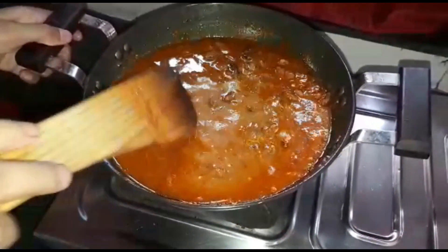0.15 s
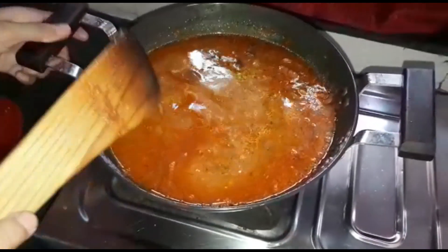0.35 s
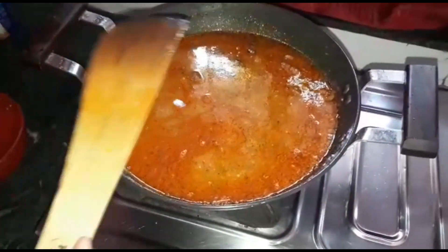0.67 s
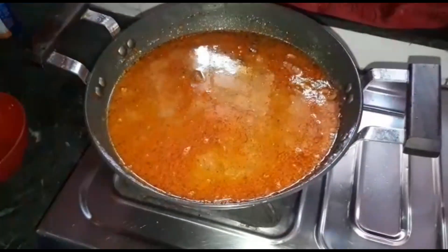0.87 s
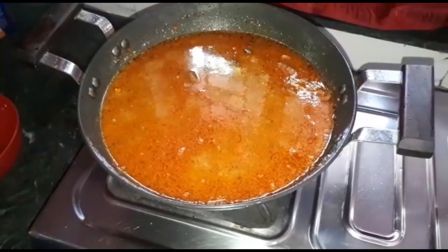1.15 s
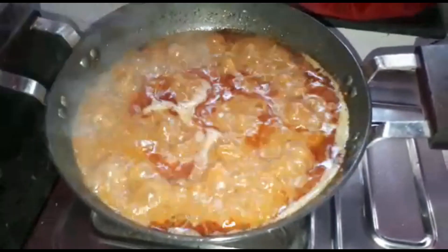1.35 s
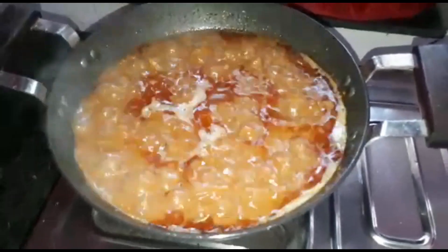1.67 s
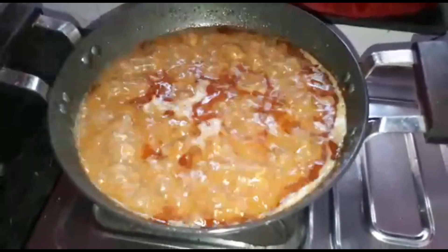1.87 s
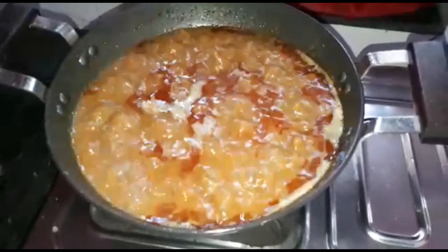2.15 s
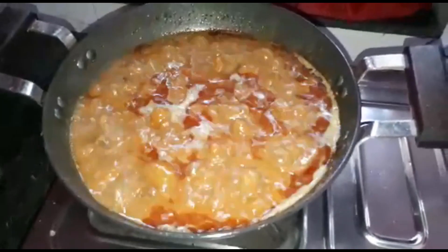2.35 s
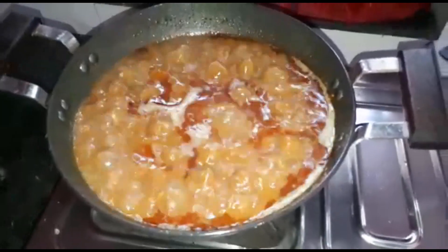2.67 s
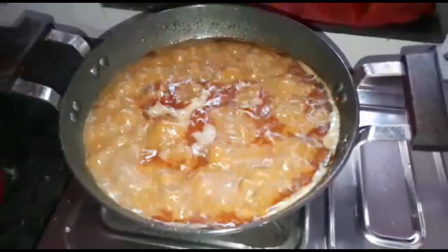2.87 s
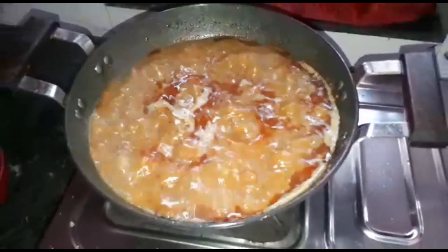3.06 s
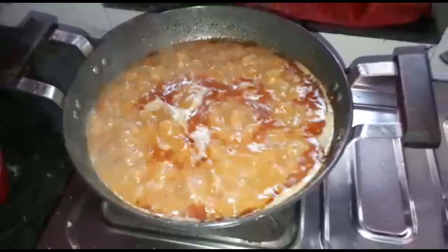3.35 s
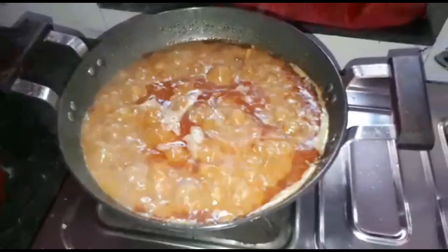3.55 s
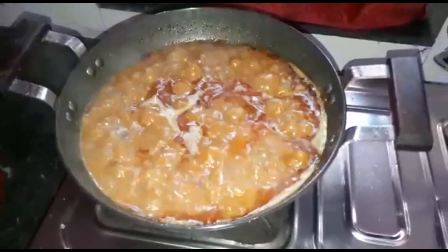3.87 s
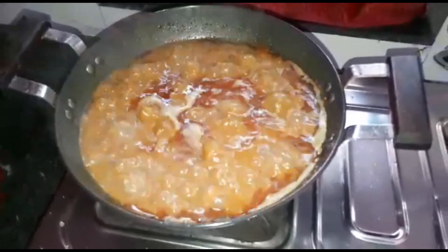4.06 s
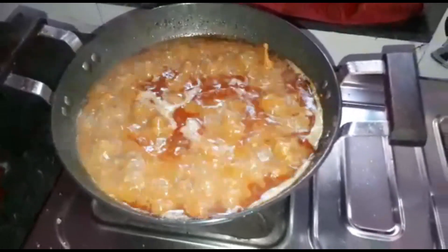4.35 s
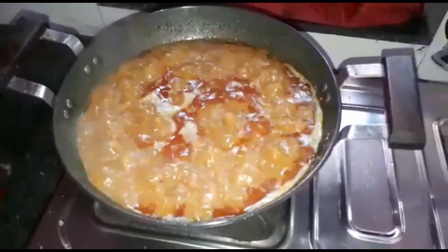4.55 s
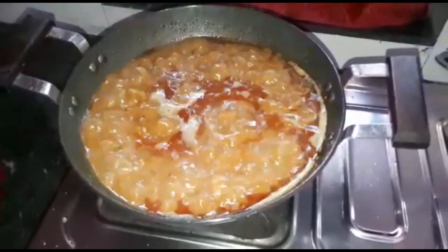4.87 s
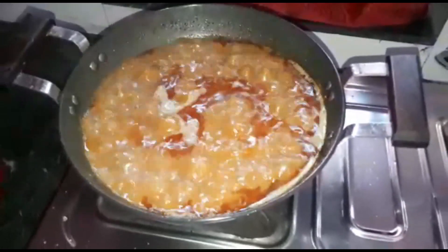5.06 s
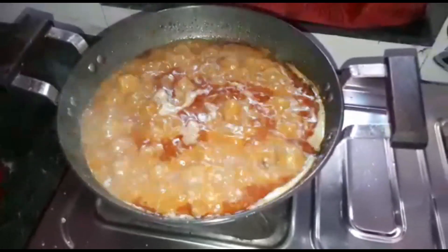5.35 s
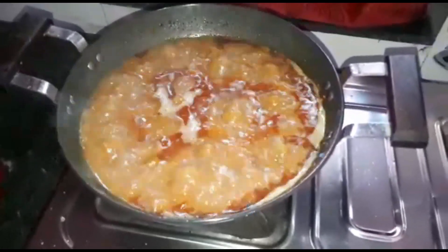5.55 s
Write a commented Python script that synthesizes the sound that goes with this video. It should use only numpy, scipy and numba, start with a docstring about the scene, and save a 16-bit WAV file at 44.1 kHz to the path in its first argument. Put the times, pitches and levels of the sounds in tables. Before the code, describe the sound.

For the first 1.2 seconds a small kitchen is very quiet: soft room tone, a slightly wavering low hum, a barely audible slosh at the start and a thin high squeak near 0.1 s. From about 0.43 to 0.6 s a spatula rattles on the pan, a short woody-metallic scrape with some five quick weakening bounces, followed by a faint rustle. At 1.24 s the sound jumps abruptly to a pan of thick curry at full boil, far louder. Short, round, wet bubble pops, mostly mid-pitched, come in irregular clusters over a dense simmer of smaller blips. Bright droplet spits tick on top, with steam hiss surging around the bigger bursts and a steady low gas-flame roar beneath. The boil repeats a 1.56-second pattern nearly three times, without fading, until about 5.7 s. Close phone pickup, stereo, with brief pan reflections and softened extreme top.

```python
"""A quiet kitchen: a wavering hum, a faint squeak (narrow noise), a spatula rattling on a pan (noise through
ringing modes). At 1.24 s thick curry on gas boils hard at once: steam bubbles burst as short rounded blips,
droplets spit as noise ticks over a dense simmer of small blips, coloured-noise steam and the roar of the flame.
The boiling is one round of 1.56 s, played nearly three times."""
import sys
import numpy as np
from scipy import signal
from scipy.fft import rfft, irfft
from scipy.io import wavfile
from numba import njit

SR = 44100
rng = np.random.default_rng(int(sys.argv[2]) if len(sys.argv) > 2 else 0)


def pcm_store(signal):
    """Save signal as 16-bit PCM."""
    levels = np.round(np.clip(np.atleast_2d(signal), -1, 1) * 32767)
    wavfile.write(sys.argv[1], SR, levels.astype(np.int16).T)


N = 251370

# Loudest bubbles of one round. Each row: time in s, pitch in Hz, peak in dB, length in cycles (1.1 at least).
BUBBLES = [(1.2439, 1760, -19.5, 1.8), (1.273, 1600, -17, 1.9), (1.2756, 11300, -34, 2.8),
           (1.2775, 1420, -22.0, 1.5), (1.2862, 1750, -17, 1.5), (1.3039, 7990, -41, 1.2),
           (1.3693, 590, -26.5, 1.6), (1.3702, 1440, -20.5, 0.89), (1.3785, 544, -35, 1.7),
           (1.3838, 930, -23, 1.2), (1.3916, 1430, -32, 4.9), (1.399, 1300, -25, 2.1),
           (1.425, 486, -31.5, 1.1), (1.4323, 900, -23, 0.88), (1.4705, 3540, -27.5, 1.7),
           (1.4736, 3940, -35.5, 1.7), (1.4916, 1190, -27, 2.4), (1.542, 1520, -23, 0.96),
           (1.5487, 1680, -20.5, 1), (1.5794, 1020, -22, 0.98), (1.5923, 1400, -24, 1.6),
           (1.609, 940, -28, 1.4), (1.6223, 7940, -37.5, 1.6), (1.6984, 1370, -22, 3),
           (1.7049, 716, -32, 2.4), (1.707, 1380, -26, 2.2), (1.7442, 430, -40, 3),
           (1.7851, 1190, -24, 2.1), (1.861, 12200, -45, 1.3), (1.8827, 1410, -22.5, 1.2),
           (1.8904, 2400, -30, 1.5), (1.8971, 1780, -14, 1), (1.9179, 2320, -25.5, 1.8),
           (1.9355, 546, -36, 2.2), (1.9567, 1560, -19, 1.4), (1.9692, 1730, -15.5, 1.2),
           (1.9732, 1420, -24, 2.3), (1.9947, 580, -31, 1.7), (2.0428, 1610, -26, 2.4),
           (2.0489, 6630, -30, 1.6), (2.049, 2830, -27.5, 1.2), (2.0526, 3400, -22.5, 1.6),
           (2.0528, 8150, -48.5, 3.3), (2.065, 2730, -24.5, 0.49), (2.0717, 2400, -22.5, 1),
           (2.0985, 920, -24, 1.6), (2.1263, 1230, -22, 1.2), (2.1648, 1860, -15, 1.6),
           (2.167, 1460, -19.5, 1.4), (2.1698, 1430, -34, 1.9), (2.1789, 7330, -49, 2.1),
           (2.1823, 2150, -22, 1.7), (2.185, 1520, -23.0, 2.2), (2.25, 7040, -30, 2.3),
           (2.2564, 650, -38.5, 1.8), (2.2688, 1080, -32.0, 5.7), (2.286, 830, -34.5, 2.5),
           (2.3037, 3900, -36.5, 3.7), (2.3089, 1180, -31.5, 2), (2.33, 1020, -28.5, 2.4),
           (2.3417, 2330, -23.5, 1.8), (2.3587, 1830, -24, 1.3), (2.3615, 1650, -20, 0.65),
           (2.394, 1010, -27, 1.5), (2.414, 1110, -26.5, 1.2), (2.4326, 1450, -26, 1.1),
           (2.449, 1320, -32.5, 2.8), (2.4525, 1390, -27, 2.1), (2.4629, 1540, -28, 1.6),
           (2.4752, 2150, -21.5, 1.6), (2.5005, 1680, -22, 1.8), (2.5281, 1860, -18.5, 1.2),
           (2.5354, 1880, -20, 2.8), (2.557, 1270, -26.5, 1.9), (2.5668, 1520, -18, 2.1),
           (2.6233, 450, -34.5, 2.8), (2.675, 1720, -24.5, 1.6), (2.7176, 1590, -23, 1),
           (2.7291, 453, -37, 2.8), (2.7535, 1420, -29, 3)]
# Small-bubble strength by pitch. Each row: pitch in Hz, added level in dB.
SIMMER_SIZE = [(300, -23.5), (480, -6.5), (1300, -2), (2400, -6), (3800, 1.5), (5500, -11.5), (7600, 0.5),
               (9300, -20), (12000, -6.5), (15800, 2.5)]
# Lulls of the coarse simmer. Each row: centre in s, half length in s, change in dB.
LULLS = [(1.318, 0.042, -5), (1.516, 0.0061, -15), (1.656, 0.039, -1.5), (1.998, .008, -10),
         (2.511, 0.017, -4.5), (2.591, 0.0078, -12), (2.774, 0.0081, -3.5)]
# Fine spray through one round. Each row: time in s, level in dB.
SPRAY_LEVEL = [(1.24, -55.5), (1.33, -56.5), (1.47, -50), (1.65, -55.5), (1.93, -52.5), (2.25, -53),
               (2.5, -52.5), (2.64, -59), (2.72, -51), (2.8, -52)]
# Arrival lag, left port first. Each row: pitch in Hz, lag in s.
PORT_LAG = [(500, 0.000059), (1100, 0.000048), (1750, 0.00017), (2800, 0.000242)]
# Port balance. Each row: pitch in Hz, left minus right in dB.
PORT_BALANCE = [(200, -12), (700, 0.5), (1300, -5), (2400, -8), (4400, 5), (8000, -1)]
# Droplets spitting on the hot wall. Each row: time in s, gate level in dB.
SPITS = [(1.2753, -43.5), (1.3033, -30.5), (1.4314, -37), (1.4663, -50), (1.5332, -44.5), (1.678, -40.5),
         (1.859, -35.5), (1.9637, -39), (2.048, -40), (2.1338, -46), (2.4397, -33.5), (2.563, -37.5),
         (2.6939, -38.5), (2.781, -40)]
# Noise colours, before levelling. Each row: frequency in Hz, relative density in dB per Hz.
SPIT_COLOUR = [(2500, 3), (5000, -0.5), (7600, 0.5), (9300, -8.5), (12000, -0.5), (15800, -10.5)]
STEAM_COLOUR = [(100, -4), (2000, 10.5), (3700, -0.5), (5500, -9.5), (7600, -9.5), (9300, -22),
                (12000, -12.5), (15800, -40)]
FLAME_COLOUR = [(25, -49), (52, -45), (68, 0.5), (85, -13.5), (125, -7), (165, 1.5), (290, -1), (420, -2.5),
                (1500, -36.5)]
KITCHEN_COLOUR = [(25, -39), (80, -25), (130, -10.5), (300, -14.5), (486, -22), (1000, -28.5),
                  (8300, -39.5), (15800, -40)]
# Pan modes. Each row: frequency in Hz, relative gain in dB, T60 in s.
PAN_MODES = [(720, 3, 0.13), (863, 7, 0.091), (933, 7.5, 0.08), (1065, 0, 0.097), (1230, -4, 0.078),
             (1410, 1.5, 0.14), (1510, 10, 0.04), (1644, 12.5, 0.039), (1860, 6, 0.045), (2070, 2, 0.052),
             (2460, 3, 0.045)]
# Faint wavering bands. Each row: centre in Hz, width in Hz, level in dB.
HUM_BANDS = [(239, 6.7, -86.5), (263, 11, -80.5), (362, 45, -81), (11900, 500, -90.5)]
# Squeak bands. Each row: start in s, length in s (decays by e^2.4), centre in Hz, level before fading in dB.
SQUEAK = [(0.108, 0.11, 5890, -61.5), (.11, 0.11, 11800, -73), (0.127, 0.17, 14700, -70)]

BOIL_START_S, ROUND_SAMPLES = 1.2415, 68796
SIMMER_PER_S, SIMMER_DB, SIMMER_SCATTER_DB, SPRAY_SCATTER_DB = 2000, -39.5, 3, 2.0
# A loud burst stirs up small bubbles, spray and steam; a share scales the stir in dB.
SWARM_DB, SWARM_LEAD_S, SWARM_DECAY_S = -23.5, 0.0066, 0.01
SWARM_SHARE, SPRAY_SHARE, STEAM_SHARE, SPIT_TILT_DB_PER_OCTAVE = .3, 0.34, 0.49, 9.5
PORT_LAG_SPREAD, PORT_PLACE_DB = 0.49, 12
SPIT_RISE_S, SPIT_DECAY_S, SPIT_HISS_DB = 0.00051, 0.0019, -5.0
SMALL_SPITS_PER_S, SMALL_SPIT_DB, SMALL_SPIT_SCATTER_DB = 89, -59, 6
PAN_ECHO_DB, PAN_ECHO_T60_S = -12, .04
FULL_PAN_HZ, FULL_PAN_T60_S, FULL_PAN_DB = 447, 0.064, -58.5
STEAM_RE_SPRAY_DB, FLAME_DB = 0.5, -48
RATTLE_START_S, BOUNCES, BOUNCE_GAP_S, BOUNCE_S = .435, 5, .026, 0.008
BOUNCE_DB, BOUNCE_STEP_DB, RIM_HZ, RIM_WIDTH_HZ = -46.5, -1, 4700, 700
SCRAPE_DB, SCRAPE_HOLD_S, SCRAPE_FADE_S, SCRAPE_BOUNCE_SHARE = -51, 0.014, 0.079, 0.22
KITCHEN_DB, HUM_HZ, HUM_DB, HUM_WOBBLE_RE_HUM_DB = -69, 157.5, -70, -21
SLOSH_S, SLOSH_DB, SLOSH_SWELL_S, SLOSH_FADE_S = 0.043, -65, 0.032, 0.042
RUSTLE_S, RUSTLE_HALF_S, RUSTLE_HZ, RUSTLE_DB = 0.63, .04, 10500, -82
TOP_HZ = 15950


def boiling():
    """One round: bubbles echoed by pan wall and stove, a full-pan boom, steam and flame; then repeated."""
    loud = burst(*np.array(BUBBLES, float).T, .12)
    # bubbles carry nothing below about 150 Hz
    highpass = signal.butter(2, 150, "high", fs=SR, output="sos")
    bubbles = signal.sosfilt(highpass, loud + simmer() + spits())
    one_round = bubbles + pan_echo(bubbles) + full_pan_boom(loud) + steam() + flame()
    return np.tile(one_round, 3)[:, :N - int(BOIL_START_S * SR)]


def burst(s, hz, db, cycles, scatter):
    """Bubble blips at two ports, offset in time and level by pitch and by chance place in the pan."""
    cycles = np.maximum(cycles, 1.1)  # even the shortest is a rounded blip
    lag_luck, turn_luck, place_luck = scatter * rng.standard_normal((len(s), 3)).T
    half_lag_s = on_log(PORT_LAG, hz) * (1 + PORT_LAG_SPREAD * lag_luck) / 2
    # low pitches bend round the phone, so place matters less
    place_db = PORT_PLACE_DB * place_luck * np.minimum(hz / 1500, 1)
    pan_db = on_log(PORT_BALANCE, hz) + place_db
    ports = []
    for side in (-1, 1):
        at = (s - BOIL_START_S + side * half_lag_s) * SR
        gain = undb(db - side * pan_db / 2)
        ports.append(blips(ROUND_SAMPLES, at, hz, gain, cycles, 2 * np.pi * turn_luck, 0.54, 0.005))
    return np.array(ports)


@njit
def blips(size, at, hz, gain, cycles, turn, rise, glide):
    """Each bubble swells quickly, then dies in a few cycles while its pitch climbs very slightly."""
    out = np.zeros(size)
    for e in range(len(at)):
        tau = cycles[e] * SR / hz[e]
        first = max(int(at[e] - 3 * rise * tau), 0)
        last = min(int(at[e] + 5 * tau), size)
        for i in range(first, last):
            u = (i - at[e]) / tau
            env = np.exp(-.5 * (u / rise) ** 2) if u < 0 else np.exp(-u / 2 - u * u / 4)
            out[i] += gain[e] * env * np.sin(turn[e] + 2 * np.pi * cycles[e] * u * (1 + glide * u / 2))
    return out


def simmer():
    """Dense small bubbles of random pitch and size, stirred by loud bursts; high ones follow the spray level."""
    when, pitch, size = rng.random((int(SIMMER_PER_S * ROUND_SAMPLES / SR), 3)).T
    s = BOIL_START_S + when * ROUND_SAMPLES / SR
    hz = 300 * 53 ** pitch
    luck = -np.log(1 - .96 * size)  # a few are larger than the rest
    lull_db = sum(db * np.exp(-((s - at) / half) ** 2) for at, half, db in LULLS)
    coarse_db = SIMMER_DB + lull_db + SIMMER_SCATTER_DB * luck + SWARM_SHARE * stir_db(s)
    fine_db = spray_db(s, SPRAY_SHARE) + SPRAY_SCATTER_DB * luck
    fine = np.clip(np.log2(hz / 2000) / 1.02, 0, 1)
    db = (1 - fine) * coarse_db + fine * fine_db + on_log(SIMMER_SIZE, hz)
    # thick gravy damps them within a cycle or two
    cycles = 1.3 * np.exp(0.35 * rng.standard_normal(len(s)))
    return burst(s, hz, db, cycles, 1)


def spits():
    """Droplets on the hot wall: very short noise ticks, loud ones at set times, faint ones at random."""
    when, size = rng.random((int(SMALL_SPITS_PER_S * ROUND_SAMPLES / SR), 2)).T
    s, db = np.transpose(SPITS)
    at = np.append(when * ROUND_SAMPLES, (s - BOIL_START_S) * SR).astype(int)
    small_db = SMALL_SPIT_DB - SMALL_SPIT_SCATTER_DB * np.log(1 - .95 * size)
    gain = undb(np.append(small_db, db))
    bright = np.append(rng.random(len(when)), np.full(len(s), .5))
    hiss = level(noise(SPIT_COLOUR, ROUND_SAMPLES, 4900), SPIT_HISS_DB)
    low = signal.sosfiltfilt(signal.butter(4, 9300, fs=SR, output="sos"), hiss)
    u = np.arange(-400, 401) / SR
    shape = np.exp(-np.abs(u) / np.where(u < 0, SPIT_RISE_S, SPIT_DECAY_S))

    def gate(share):
        """Tick envelopes weighted by share."""
        return signal.fftconvolve(np.bincount(at, 2 * share * gain, ROUND_SAMPLES), shape, "same")

    return gate(1 - bright) * low + gate(bright) * (hiss - low)


def stir_db(s, tilt_db=0):
    """Surface stir by loud bursts at times s; tilt_db per octave favours the high, spitting ones."""
    stir = 0
    for at, hz, db, _ in BUBBLES:
        strength = undb(db - SWARM_DB + tilt_db * np.log2(hz / 1500))
        stir = stir + strength * np.exp(-np.abs(s - at) / np.where(s < at, SWARM_LEAD_S, SWARM_DECAY_S))
    return 20 * np.log10(1 + stir)


def spray_db(s, share):
    """Spray level at times s, raised by a share of the tilted stir."""
    return np.interp(s, *np.transpose(SPRAY_LEVEL)) + share * stir_db(s, SPIT_TILT_DB_PER_OCTAVE)


def pan_echo(bubbles):
    """Brief reflections off pan wall and stove: convolution with decaying noise."""
    t = np.arange(int(.08 * SR)) / SR
    echo = noise([(20, 0), (20000, 0)], len(t), 1000) * undb(-60 * t / PAN_ECHO_T60_S) * (t > .002)
    echo = echo * undb(PAN_ECHO_DB) / np.sqrt(np.sum(echo ** 2, axis=1, keepdims=True))
    return signal.fftconvolve(bubbles, echo, axes=1)[:, :ROUND_SAMPLES]


def full_pan_boom(loud):
    """The full pan booms softly under the bursts: one mode driven by their slope."""
    return level(ring(np.diff(loud, prepend=0), FULL_PAN_HZ, FULL_PAN_T60_S), FULL_PAN_DB)


def steam():
    """Coloured noise; steam escapes harder while the surface is stirred."""
    s = BOIL_START_S + np.arange(ROUND_SAMPLES) / SR
    surge = undb(spray_db(s, STEAM_SHARE))
    return surge * level(noise(STEAM_COLOUR, ROUND_SAMPLES, 1000), STEAM_RE_SPRAY_DB)


def flame():
    """Gas flame roar: steady low coloured noise."""
    return level(noise(FLAME_COLOUR, ROUND_SAMPLES, 1700), FLAME_DB)


def spatula():
    """Even, weakening bounces hiss at the rim over a scrape that rings the pan modes, holds and fades."""
    t = np.arange(N) / SR - RATTLE_START_S
    taps = [t - .009 - k * BOUNCE_GAP_S for k in range(BOUNCES)]
    bounce = [np.exp(-(u / np.where(u < 0, .008, BOUNCE_S)) ** 2) * (t > 0) for u in taps]
    chatter = sum(undb(BOUNCE_DB + k * BOUNCE_STEP_DB) * b for k, b in enumerate(bounce))
    fade = np.exp(-(np.maximum(t - SCRAPE_HOLD_S, 0) / SCRAPE_FADE_S) ** 2)
    bumps = 1 - SCRAPE_BOUNCE_SHARE + SCRAPE_BOUNCE_SHARE * sum(bounce)
    scrape = undb(SCRAPE_DB) * np.clip(t / 0.0015, 0, 1) * fade * bumps
    scratch = scrape * band(1550, 2750)
    body = sum(undb(db) * ring(scratch, hz, t60_s) for hz, db, t60_s in PAN_MODES)
    rim = chatter * fade * band(RIM_HZ, RIM_WIDTH_HZ, order=3)
    first_hit = undb(-16.5) * bounce[0] * scrape * band(6400, 3000)
    rasp = scrape * band(3920, 1000)
    left = undb(-41.0) * body + undb(-29) * scratch + rim + first_hit + rasp
    return np.array([left, undb(3) * np.roll(left, 6)])  # right: louder, 6 samples later


def kitchen():
    """Room tone (coloured noise) with hum, faint bands, squeak, slosh and rustle."""
    room = level(noise(KITCHEN_COLOUR, N, 420), KITCHEN_DB)
    return room + hum() + squeak() + slosh() + rustle()


def hum():
    """A sine wavering through narrow noise at its pitch, plus faint noise bands."""
    t = np.arange(N) / SR
    sine = np.sqrt(2) * np.sin(2 * np.pi * HUM_HZ * t)
    tone = undb(HUM_DB) * (sine + undb(HUM_WOBBLE_RE_HUM_DB) * band(HUM_HZ, 30))
    return tone + sum(undb(db) * band(hz, width_hz) for hz, width_hz, db in HUM_BANDS)


def squeak():
    """Thin squeak: narrow high noise bands with a short rise and exponential decay."""
    t = np.arange(N) / SR
    out = np.zeros(N)
    for s, length_s, hz, db in SQUEAK:
        env = np.clip((t - s) / 0.017, 0, 1) * np.exp(-np.abs(t - s) / length_s * 2.4)
        out += undb(db) * band(hz, 160) * env
    return out


def slosh():
    """Soft slosh in the pan: one swell of mid-band noise."""
    t = np.arange(N) / SR - SLOSH_S
    env = np.exp(-(t / np.where(t < 0, SLOSH_SWELL_S, SLOSH_FADE_S)) ** 2)
    return undb(SLOSH_DB) * env * band(520, 760)


def rustle():
    """Faint high rustle: one bell-shaped puff of noise."""
    t = np.arange(N) / SR - RUSTLE_S
    return undb(RUSTLE_DB) * np.exp(-(t / RUSTLE_HALF_S) ** 2) * band(RUSTLE_HZ, 2400)


def ring(x, hz, t60_s):
    """One decaying mode: a complex one-pole resonator."""
    pole = np.exp(2j * np.pi * hz / SR - np.log(1000) / (t60_s * SR))
    return signal.lfilter([1], [1, -pole], x).imag


def noise(spectrum, size, alike_hz):
    """Two-channel noise of a given colour, increasingly alike left and right below alike_hz."""
    hz = np.arange(size // 2 + 1) * SR / size
    mid, side = rfft(rng.standard_normal((2, size)))
    apart = np.maximum(hz / np.hypot(hz, alike_hz), .22)
    pair = np.array([mid + apart * side, mid - apart * side])
    return irfft(undb(on_log(spectrum, hz)) * pair, size)


def band(hz, width_hz, order=2):
    """Narrow noise around a pitch, rms 1."""
    edges_hz = [hz - width_hz / 2, hz + width_hz / 2]
    sos = signal.butter(order, edges_hz, "band", fs=SR, output="sos")
    return level(signal.sosfilt(sos, rng.standard_normal(N)), 0)


def on_log(table, hz):
    """Read a (Hz, value) table on a log-frequency axis."""
    f, v = np.transpose(table)
    return np.interp(np.log(np.maximum(hz, 1)), np.log(f), v)


def level(x, db):
    """Set the rms level in dB."""
    return x * undb(db) / np.sqrt(np.mean(x ** 2))


def undb(db):
    """Gain of a level in dB."""
    return 10 ** (np.asarray(db) / 20)


def scene():
    """The quiet kitchen gives way at once to the boiling pan."""
    start = int(BOIL_START_S * SR)
    quiet = (kitchen() + spatula())[:, :start]
    return np.concatenate([quiet, boiling()], axis=1)


def record(dry):
    """The phone cuts the top: a steep elliptic low-pass."""
    return signal.sosfilt(signal.ellip(10, .2, 60, TOP_HZ, fs=SR, output="sos"), dry)


dry = scene()
out = record(dry)
pcm_store(out)
```